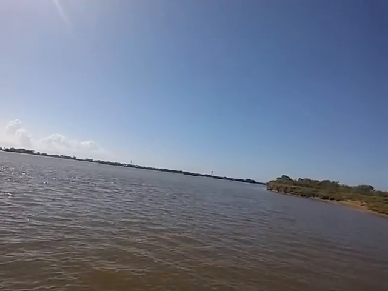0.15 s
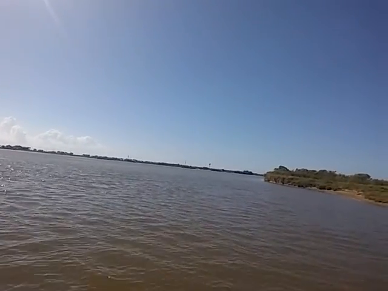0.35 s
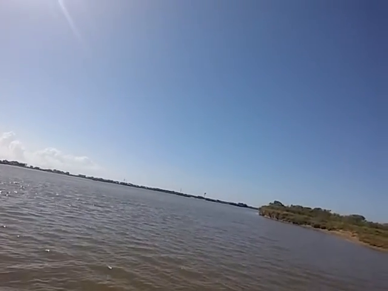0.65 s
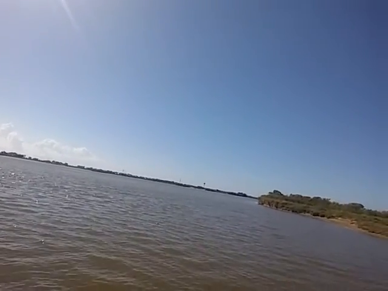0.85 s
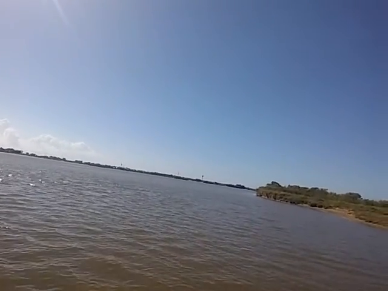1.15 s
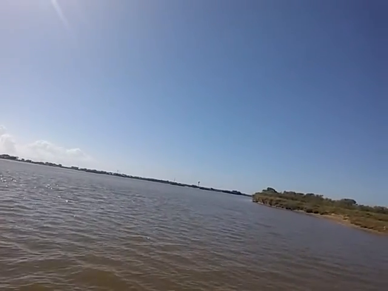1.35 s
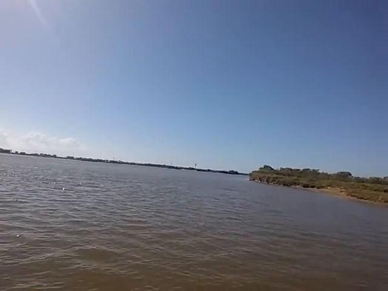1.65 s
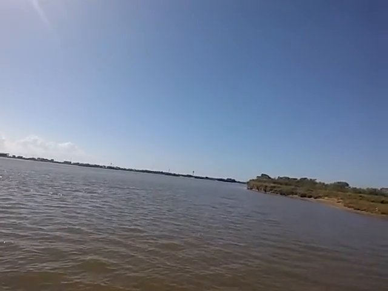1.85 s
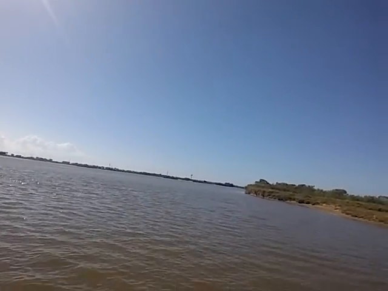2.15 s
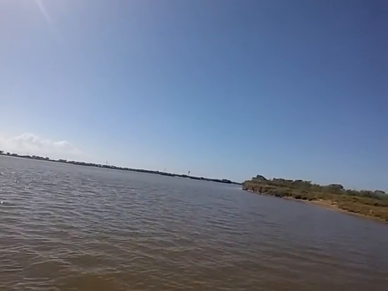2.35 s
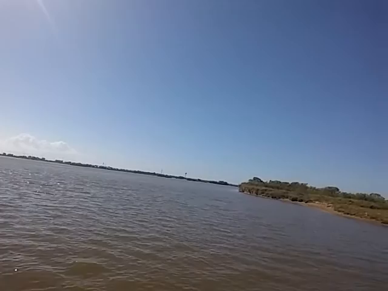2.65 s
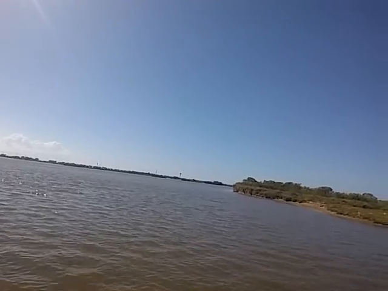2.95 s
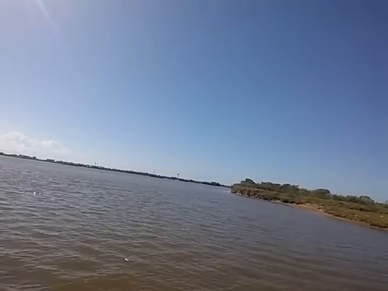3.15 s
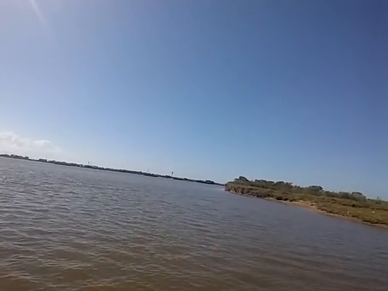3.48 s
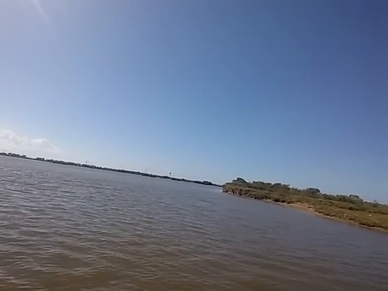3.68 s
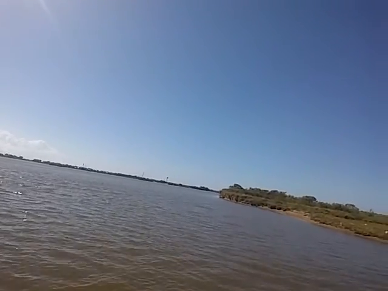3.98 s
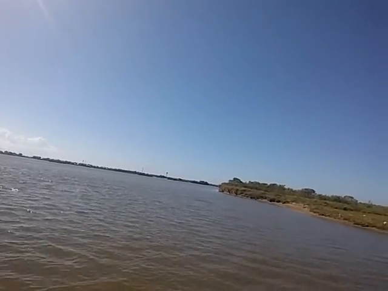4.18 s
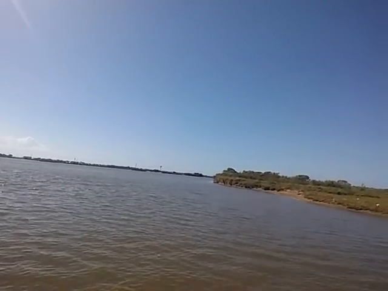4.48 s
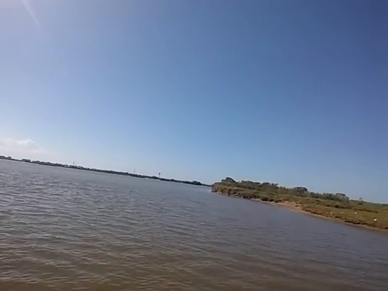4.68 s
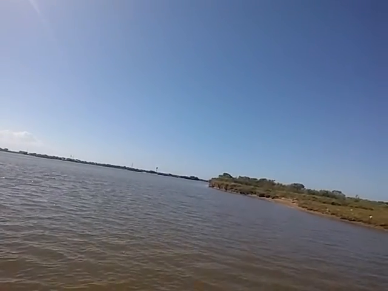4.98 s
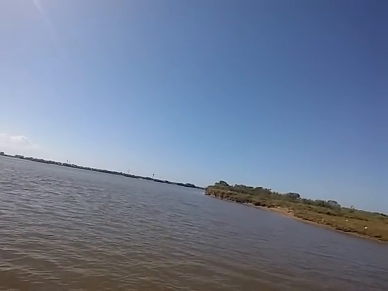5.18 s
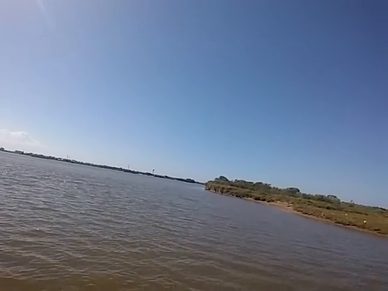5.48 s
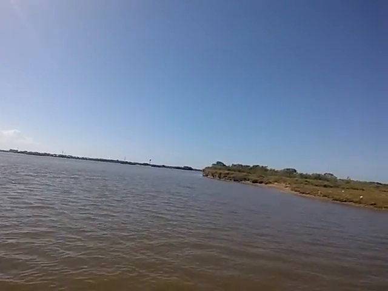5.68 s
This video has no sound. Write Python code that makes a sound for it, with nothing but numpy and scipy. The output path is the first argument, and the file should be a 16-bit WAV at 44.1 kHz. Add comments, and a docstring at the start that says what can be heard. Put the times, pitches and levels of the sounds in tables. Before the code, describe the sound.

Close, dry hull thuds and isolated bright clicks punctuate soft low water rumble as a kayak and its loose gear rock on chop.

```python
"""Wavelets slap the hollow hull of a plastic kayak on choppy water: short swings of squeezed air, with rebounds.
Under them lie a low wash made of small laps and ripples, and a brief trickle of ringing bubbles.
A small metal fitting clicks sharply: a snap and a gritty crack, then metal and deck tones that ring on.
Loose plastic gear clacks in bursts of noise with a short tone, and fabric swishes close by as shaped noise.
A faint steady microphone hiss lies under everything."""
import sys
import numpy as np
from scipy import signal
from scipy.fft import rfft, irfft
from scipy.io import wavfile

SR = 44100
rng = np.random.default_rng(int(sys.argv[2]) if len(sys.argv) > 2 else 0)


def log_audio(samples):
    """Write samples as a 16-bit WAV file to the path given in sys.argv[1]."""
    # one column per channel
    frames = np.atleast_2d(samples).T
    # limit to full scale, then quantise
    limited = np.clip(frames, -1, 1)
    pcm = np.round(limited * 32767).astype(np.int16)
    wavfile.write(sys.argv[1], SR, pcm)


N = 256750  # length of the scene in samples


def amp(db):
    """Turns decibels into a gain."""
    return 10 ** (np.asarray(db) / 20)


def unit(x):
    """Scales a sound to an average (rms) level of 1."""
    return x / np.sqrt(np.mean(x ** 2) + 1e-20)


def add(mix, start_s, sound):
    """Mixes a sound in at a start time, cutting off what runs past the end."""
    part = mix[max(round(start_s * SR), 0):][:len(sound)]
    part += sound[:len(part)]


def colour(x, points, tilt_db=0):
    """Filters x to a curve of (pitch_hz, level_db) points, tilted by tilt_db per octave, at rms 1."""
    noise_edge_hz = 15850  # nothing is left above this
    hz = np.fft.rfftfreq(len(x), 1 / SR) + 1
    point_hz, point_db = np.transpose(points)
    curve_db = np.interp(np.log(hz), np.log(point_hz), point_db)
    tilt_curve_db = tilt_db * np.log2(np.maximum(hz, 300) / 3000)
    gain = amp(curve_db + tilt_curve_db) * (hz < noise_edge_hz)
    return unit(irfft(rfft(x) * gain, len(x)))


def drift(rate_hz):
    """Slow random wandering of rms 1: noise that fades out above the given rate."""
    hz = np.fft.rfftfreq(N, 1 / SR)
    spectrum = rfft(rng.standard_normal(N)) / (1 + (hz / rate_hz) ** 4)
    return unit(irfft(spectrum, N))


def grains(per_s, spread_db):
    """A random train of single-sample impulses of unequal size and either sign."""
    size_db = spread_db * np.minimum(rng.exponential(1, N), 4)
    size = amp(size_db) * rng.choice([-1, 1], N)
    return size * (rng.random(N) < per_s / SR)


def ring(modes, t, rise_s, bright_db=0):
    """Decaying tones that take a moment to build up; each blow shares them out a little differently."""
    tones = np.zeros(len(t))
    for hz, level_db, t60_s in modes:
        chance_db = rng.uniform(-2, 2)
        tilt_db = bright_db * np.log2(hz / 4900)
        fall_db = 60 * t / t60_s
        tones += amp(level_db + chance_db + tilt_db - fall_db) * np.sin(2 * np.pi * hz * t)
    return (1 - np.exp(-t / rise_s)) * tones


def swell(t, peak_s, power):
    """A contact force that grows to 1 at peak_s and dies away."""
    return (t / peak_s * np.exp(1 - t / peak_s)) ** power


def microphone_hiss():
    """Steady noise of the microphone itself, with more in the bass and the highest treble."""
    # tone colour of the hiss: (pitch_hz [Hz], level_db [dB])
    hiss_colour = [(100, 3.5), (7000, -9.5), (9500, -6.5), (12000, 1), (15500, 3.5)]
    return amp(-67.5) * colour(rng.standard_normal(N), hiss_colour)


def water():
    """Countless small laps drum on the hull in a low rumble, under the wash of open water."""
    # the chop swells and eases: (time_s [s], level of the low rumble before its surges level_db [dB])
    chop = [(0.0, -37), (0.26, -37.5), (0.92, -33.5), (1.83, -38), (2.45, -35), (4.05, -38.5), (4.21, -34),
            (4.73, -32), (5.22, -36.5), (5.4, -36.5), (5.69, -33), (5.82, -30.5)]
    # tone colour of the rumble: (pitch_hz [Hz], level_db [dB])
    rumble_colour = [(20, -44.5), (32, -31.5), (50, -18.5), (70, -8), (95, -1), (160, -1), (250, -6),
                     (400, -14), (600, -24), (1200, -52), (3000, -74)]
    # tone colour of the wash: (pitch_hz [Hz], level_db [dB])
    wash_colour = [(150, -9), (450, 0), (900, -2.5), (1400, -11.5), (2800, -16.5), (4000, -21.5),
                   (5500, -22), (7700, -26.5), (9000, -34), (16000, -43)]
    laps_per_s, lap_blur = 240, 0.59  # blur: share of steady noise, for laps too crowded to tell apart
    wash_db, wash_follows = -48.5, 0.15  # open water follows the chop by only this share

    chop_db = np.interp(np.arange(N) / SR, *np.transpose(chop))
    laps = unit(grains(per_s=laps_per_s, spread_db=2.5)) + lap_blur * rng.standard_normal(N)
    surge_db = 2.4 * np.abs(drift(25))  # surges only rise above the steady chop
    rumble = colour(laps, rumble_colour) * amp(chop_db + surge_db)

    ripples = unit(grains(per_s=1200, spread_db=1)) + 2.16 * rng.standard_normal(N)
    follow_db = wash_follows * (chop_db - chop_db.mean())
    wash = colour(ripples, wash_colour) * amp(wash_db + follow_db + 0.47 * drift(20))
    return rumble + wash


def bubbles():
    """Small bubbles ring for a few cycles and rise in pitch; a few longer chirps gurgle among them."""
    # faint gurgling chirps: (start_s [s], level_db [dB], start_hz [Hz], end_hz [Hz], length_s [s])
    chirps = [(1.317, -37, 1720, 1660, 0.017), (1.367, -48, 2410, 2190, .055),
              (1.55, -47, 1430, 1260, 0.044), (1.594, -40, 930, 1030, 0.024),
              (1.604, -42.5, 1323, 1250, 0.045), (1.638, -44, 800, 840, 0.03)]
    trickle_start_s, trickle_end_s, trickle_fade_s = 1.3, 1.72, 0.078  # water runs off the boat
    trickle_per_s, stray_per_s = 170, 9.2  # bubbles in the full trickle, and around the hull all along

    out, t, now = np.zeros(N), np.arange(SR // 25) / SR, np.arange(N) / SR
    inside_s = np.minimum(now - trickle_start_s, trickle_end_s - now)
    flow = np.clip(0.5 + inside_s / trickle_fade_s, 0, 1)
    per_s = stray_per_s + trickle_per_s * flow
    births = np.flatnonzero(rng.random(N) < per_s / SR)
    for at, (small, faint) in zip(births, rng.random((len(births), 2))):
        cycles = 700 * 3.0 ** small * t  # smaller bubbles ring higher, starting at 700 to 2100 Hz
        swing = np.sin(2 * np.pi * cycles * (1 + 0.002 * cycles))
        tone = swing * np.exp(-cycles / 11) * (1 - np.exp(-cycles))
        flow_db = 5 * np.log10(per_s[at] / per_s.max())  # a stronger trickle makes louder bubbles
        add(out, at / SR, amp(-35 - 12.5 * faint - 7.8 * small + flow_db) * tone)
    for start_s, level_db, start_hz, end_hz, length_s in chirps:
        hz = np.linspace(start_hz, end_hz, int(length_s * SR))
        tone = np.sin(2 * np.pi * np.cumsum(hz) / SR)
        add(out, start_s, amp(level_db) * np.hanning(len(hz)) * tone)
    return out


def fabric():
    """Fibres catch and slip in a dense swish that grows and fades as each stroke speeds up and slows down."""
    # strokes of rubbing: (fastest_s [s], level_db [dB], rise_s [s], fall_s [s])
    strokes = [(.655, -49.5, 0.031, 0.043), (1.085, -41, .07, 0.029), (1.27, -45, .11, 0.078),
               (1.39, -44, 0.062, 0.079), (1.55, -46.5, 0.11, 0.27), (2.45, -38, 0.14, 0.083),
               (4.248, -34.5, 0.022, 0.02), (4.32, -48.5, .05, 0.083), (5.67, -55, .15, 0.071)]
    # tone colour of the swish: (pitch_hz [Hz], level_db [dB])
    rub_colour = [(150, -15), (500, 13), (1100, 4.5), (1700, 2), (3000, 0.5), (5000, -3), (6900, -1.5),
                  (8000, -8.5), (9500, -13), (12000, -16), (15500, -15)]
    fizz_colour = [(1500, -26), (5000, 7.5), (7000, 9), (10000, -5.5), (15500, -21.5)]  # (Hz, dB)
    fizz_db, fizz_growth = -44, 0.97  # fizz at the fastest moment, and its dB per dB of stroke

    t = np.arange(N) / SR
    power = np.zeros(N)
    for fastest_s, level_db, rise_s, fall_s in strokes:
        width_s = np.where(t < fastest_s, rise_s, fall_s)
        stroke = amp(level_db) * np.exp(-((t - fastest_s) / width_s) ** 2)
        power += stroke ** 2
    speed = np.sqrt(power)

    fibres = unit(grains(per_s=3400, spread_db=4)) + 1.4 * rng.standard_normal(N)
    swish = colour(fibres, rub_colour) * speed
    fizz = colour(rng.standard_normal(N), fizz_colour)
    fizz = amp(fizz_db) * fizz * (speed / speed.max()) ** fizz_growth
    return (swish + fizz) * amp(0.8 * drift(60))  # the level flickers slightly


def clacks():
    """Plastic on plastic: a burst of tiny contacts, the short tone of the part, and a faint rattle of the deck."""
    # single clacks: (start_s [s], level_db [dB], brightness bright_db [dB per octave],
    # decay_s [s], own tone pitch_hz [Hz], tone_db [dB])
    clack_list = [(.854, -33, -2.5, 0.0018, 1840, -5), (0.8974, -37, -6, .0028, 1930, -3),
                  (1.351, -31, -6.5, .011, 612, 6.5), (2.363, -12.5, -11.5, .0013, 1080, -11),
                  (2.3651, -22, 2.5, 0.0063, 1033, -2.5), (4.190, -38.5, -16, .0028, 1340, 2.5),
                  (4.2176, -33.5, -1.5, 0.0039, 2240, -14), (4.2657, -20.5, 0, 0.0029, 1516, 5),
                  (4.2675, -16.5, -2.5, 0.0029, 2560, -1.5), (4.309, -19, 4, .0016, 1600, -3),
                  (4.3139, -14.5, 6, .0024, 6070, -3), (5.5893, -33.5, -5, .002, 2530, .5)]
    # tone colour of burst and rattle: (pitch_hz [Hz], level_db [dB])
    clack_colour = [(150, -13), (450, -2), (1200, 4.5), (1700, -1.5), (3000, -4.5), (4500, -9.5),
                    (6500, -7), (8000, -23), (9500, -31), (16000, -56)]

    out, t = np.zeros(N), np.arange(SR // 8) / SR
    press = 1 - np.exp(-(t / 0.000065) ** 2)  # plastic yields before it rebounds
    for start_s, level_db, bright_db, decay_s, pitch_hz, tone_db in clack_list:
        contacts = colour(rng.laplace(size=len(t)), clack_colour, bright_db)
        burst = contacts * np.exp(-t / decay_s)
        tone_shape = swell(t, peak_s=0.2 * decay_s, power=0.24)
        tone = amp(tone_db) * np.sin(2 * np.pi * pitch_hz * t) * tone_shape
        rattle = colour(rng.standard_normal(len(t)), clack_colour, -2) * np.exp(-t / 0.018)
        add(out, start_s, amp(level_db) * press * (burst + tone + amp(-16) * rattle))
    return out


def clicks():
    """The fitting snaps within a few milliseconds, then metal and deck ring on."""
    # single clicks: (start_s [s], force_db [dB], brightness bright_db [dB per octave],
    # gritty crack_db [dB], long metal ring metal_db [dB], deck ring deck_db [dB])
    click_list = [(1.2600, -34.5, -2, -6, 5, -8), (1.2840, -9.5, -2, -8, -6, 0.5),
                  (1.2879, -17.5, -2, -8.5, -4, 2.5), (1.2930, -18.5, -6, -6, 3, -24),
                  (1.3095, -35, -5, -9.5, -8, -8), (1.7175, -4, -1, -7, 1, -7),
                  (1.7216, -4.5, -3.5, -8.5, -1, -3), (3.0023, -7.5, 1, -12, 1, 3.5),
                  (3.527, -13, 2.5, -10.5, 7, -5), (4.6005, -24.5, -2.5, -12.5, 3, -16),
                  (5.2987, -19.5, -5.5, -12.5, 0, -4.5), (5.7727, -3.5, 0.5, -15.5, -1.5, -2)]
    # broad resonances of the snap: (pitch_hz [Hz], level_db [dB])
    snap_tones = [(1790, -4.5), (2080, -26), (2600, -12), (5080, 0.5), (6400, -15.5), (7000, -14.5),
                  (7600, -10), (10900, -30.5)]
    # tone colour of the crack: (pitch_hz [Hz], level_db [dB])
    crack_colour = [(300, -16), (700, -4), (1250, -19), (1800, 3.5), (2600, 6.5), (3500, 1), (5000, 3.5),
                    (7600, 9.5), (9300, -8.5), (11000, -8.5), (12500, -25), (16000, -20)]
    # tones that ring on in the metal: (pitch_hz [Hz], level_db [dB], time to fall by 60 dB t60_s [s])
    metal_modes = [(3100, -32, 0.049), (3640, -37, 0.06), (3920, -34, 0.0707), (4710, -28, .075),
                   (4910, -13, .079), (5150, -24, 0.027), (6400, -47.5, .05), (7300, -35, 0.056),
                   (8360, -38.5, 0.077), (10700, -52, 0.13)]
    # tones that ring on in the deck: (pitch_hz [Hz], level_db [dB], time to fall by 60 dB t60_s [s])
    deck_modes = [(304, -18.5, .07), (478, -17.5, 0.068), (625, -7.5, 0.056), (700, -19.5, .03),
                  (842, -14, 0.06), (1809, -22, 0.048)]

    out, t = np.zeros(N), np.arange(SR // 7) / SR
    chatter = swell(t, peak_s=0.0014, power=3.2)
    grit = swell(t, peak_s=0.00096, power=0.56)
    for start_s, force_db, bright_db, crack_db, metal_db, deck_db in click_list:
        snap = np.zeros(len(t))
        for pitch_hz, level_db in snap_tones:
            tilt_db = bright_db * np.log2(pitch_hz / 3500)
            snap += amp(level_db + tilt_db) * np.sin(2 * np.pi * pitch_hz * t)
        crack = colour(rng.standard_normal(len(t)), crack_colour, bright_db)
        contact = snap * chatter + amp(crack_db) * crack * grit
        scatter = amp(-27.0) * crack * np.exp(-t / 0.01)  # many weak modes of the gear around it
        metal = amp(metal_db) * ring(metal_modes, t, rise_s=0.001, bright_db=bright_db)
        deck = amp(deck_db) * ring(deck_modes, t, rise_s=0.0013)
        add(out, start_s, amp(force_db) * (contact + scatter + metal + deck))
    return out


def squeezed_air(t, hz, cycles):
    """A pocket of air squeezed under the hull: a brief swing around t = 0 that dies within a few cycles."""
    return np.sin(2 * np.pi * hz * t) / np.cosh(np.clip(t * hz / cycles, -30, 30))


def slaps():
    """Wavelets knock on the hull and rebound: each knock a round thud, a sharper edge and a hollow after-sound."""
    # single slaps: (middle of the first knock middle_s [s], level_db [dB], pitch_hz [Hz],
    # sharp edge_db [dB], length [cycles], loss_db at each rebound [dB])
    slap_list = [(.933, -21.5, 378, -11.5, 0.26, 25), (1.0176, -13.5, 320, 0, 0.2, 27),
                 (1.031, -11.5, 277, -18, 0.38, 3), (1.248, -19, 282, -26, 0.48, 23),
                 (1.385, -13.5, 209, -10, 0.39, 25), (1.544, -19, 285, -18, 0.33, 20),
                 (2.399, -15.5, 249, -25, 0.36, 8), (2.4956, -11, 280, -25, .36, 25),
                 (2.6525, -16.5, 275, -9, 0.31, 18), (2.690, -18, 175, -28, 0.48, 24.5),
                 (2.889, -14, 216, -25, 1.15, 24), (2.901, -14.5, 187, -5.5, 0.54, 25),
                 (3.111, -15, 250, -26, 0.31, 8.5), (3.186, -13.5, 200, -26, 0.38, 25),
                 (4.430, -21.5, 196, -27, 0.57, 15), (4.506, -8, 301, -10, 0.55, 23),
                 (4.537, -20, 270, -12, 0.48, 20), (4.608, -15.5, 170, -36, 0.35, 24),
                 (5.0634, -9.5, 153, -12, 0.38, 9), (5.173, -21, 188, -27, 0.32, 25),
                 (5.442, -18.5, 249, -32, 0.3, 6), (5.4667, -11, 212, -20, 0.32, 25),
                 (5.717, -14, 174, -21, 0.34, 3), (5.8022, -13, 255, -13, 0.29, 27)]
    hollow_colour = [(80, 3.5), (250, 5.5), (450, 7.0), (750, -33), (1300, -33.5), (3000, -61)]  # (Hz, dB)
    rebound_s, rebound_dull_db = 0.01291, 1  # the water falls back, each time with a softer edge
    edge_ring_hz, hollow_db = 537, -17

    out, t = np.zeros(N), np.arange(-SR // 25, SR // 12) / SR
    after_shape = swell(np.maximum(t, 0), peak_s=0.0032, power=0.8)
    for middle_s, level_db, pitch_hz, edge_db, cycles, loss_db in slap_list:
        for k in range(4):  # the first knock and three rebounds
            thud = squeezed_air(t, pitch_hz, cycles)
            edge_gain = amp(edge_db - k * rebound_dull_db)
            edge = edge_gain * squeezed_air(t, edge_ring_hz, cycles=0.41)
            hollow = colour(rng.standard_normal(len(t)), hollow_colour)
            after = amp(hollow_db) * hollow * after_shape
            knock = amp(level_db - k * loss_db) * (thud + edge + after)
            add(out, middle_s + k * rebound_s + t[0], knock)
    return out


def scene():
    """Adds all the sounds with no echo: everything is close and dry on open water."""
    background = microphone_hiss() + water() + bubbles()
    gear = fabric() + clacks() + clicks()
    return (background + gear + slaps())[None]


def record(dry):
    """The microphone sheds deep bass and rounds off the loudest peaks; then the highest treble is cut."""
    edge_hz = 16600
    bass_cut = signal.butter(3, 42, "highpass", fs=SR, output="sos")
    thin = signal.sosfilt(bass_cut, dry)
    rounded = thin / (1 + (thin / 0.93) ** 6) ** (1 / 6)  # overload: levels off towards 0.93
    treble_cut = signal.firwin(301, edge_hz, window=("kaiser", 9), fs=SR)
    return signal.oaconvolve(rounded, treble_cut[None], "same")


dry = scene()
out = record(dry)
log_audio(out)
```